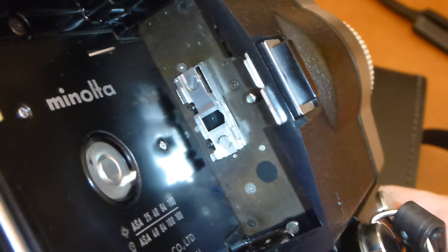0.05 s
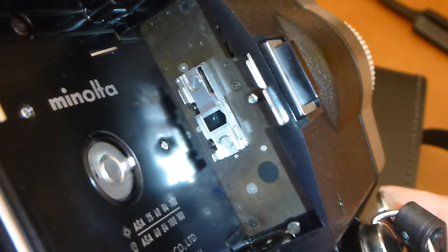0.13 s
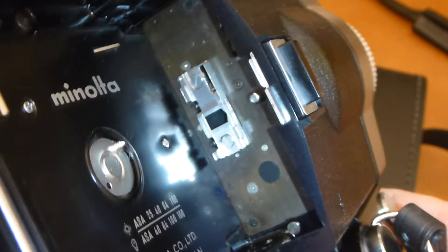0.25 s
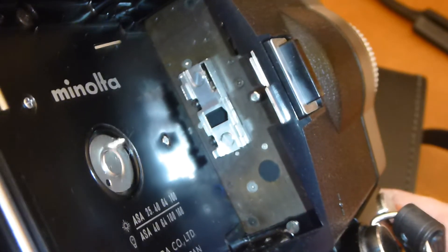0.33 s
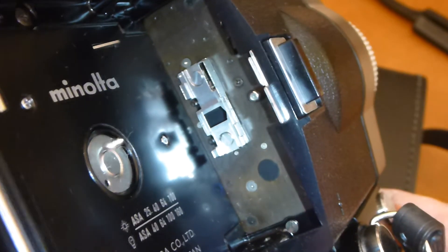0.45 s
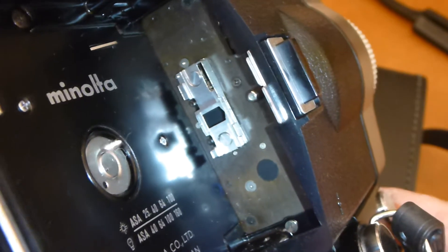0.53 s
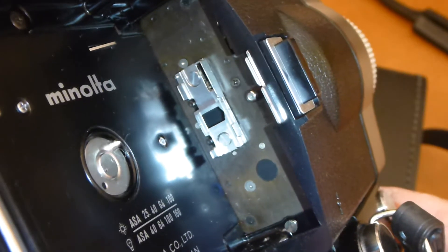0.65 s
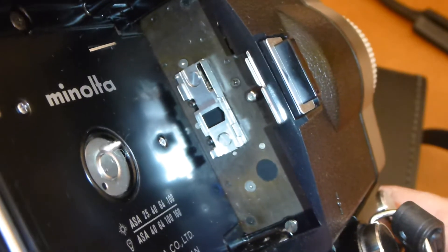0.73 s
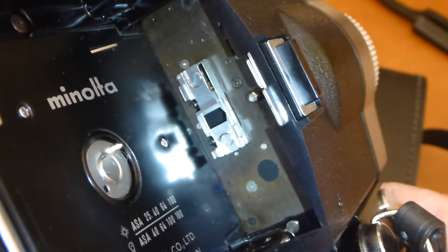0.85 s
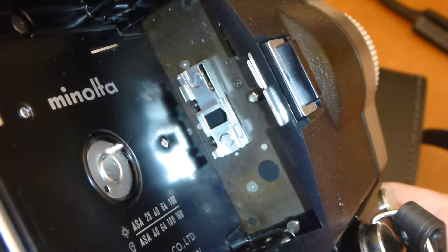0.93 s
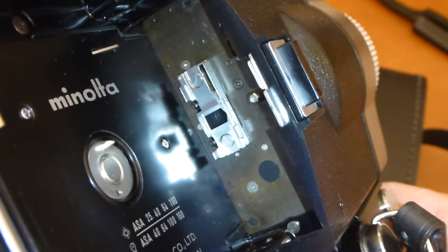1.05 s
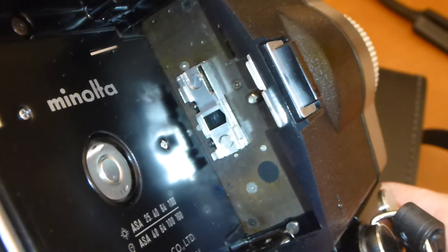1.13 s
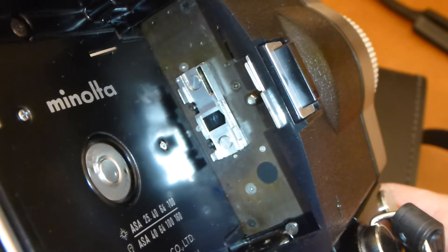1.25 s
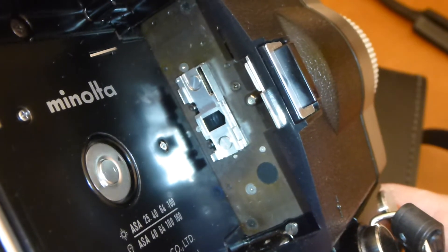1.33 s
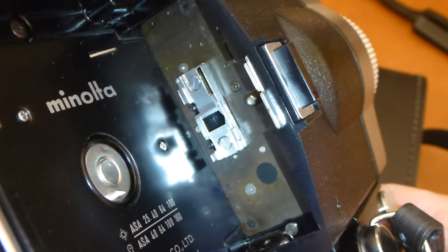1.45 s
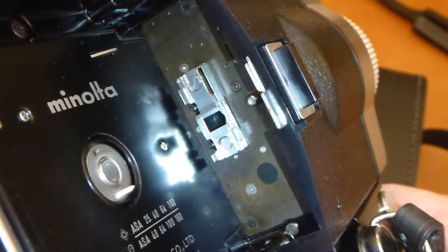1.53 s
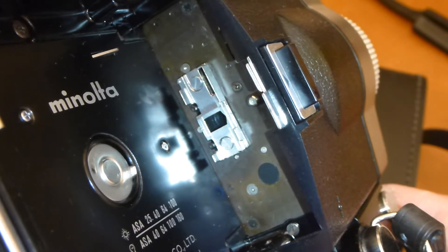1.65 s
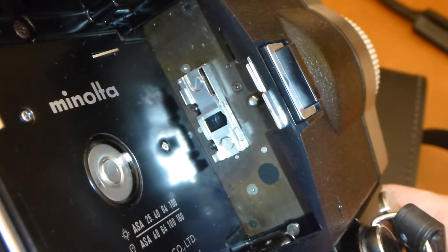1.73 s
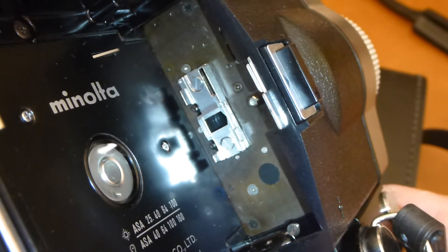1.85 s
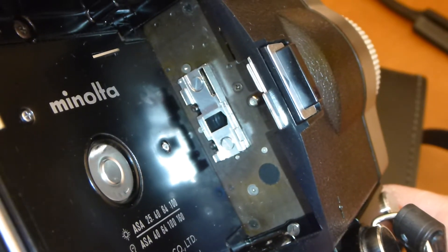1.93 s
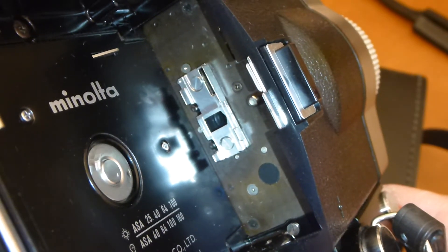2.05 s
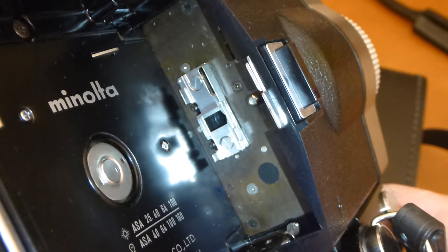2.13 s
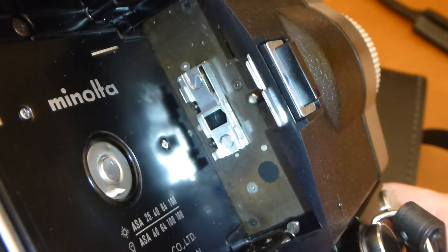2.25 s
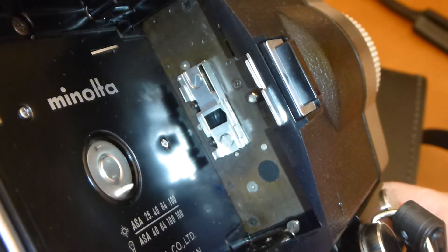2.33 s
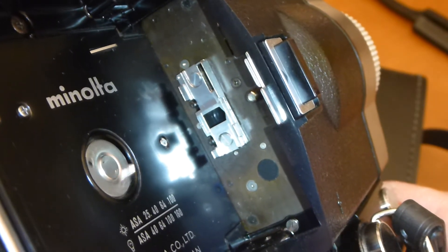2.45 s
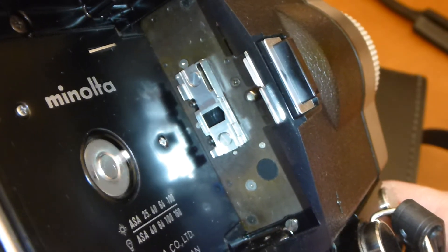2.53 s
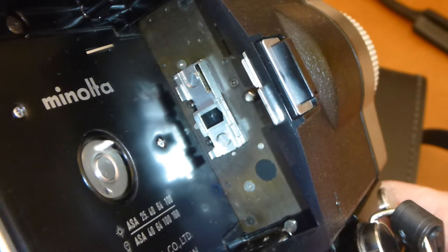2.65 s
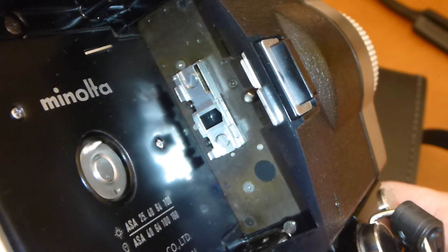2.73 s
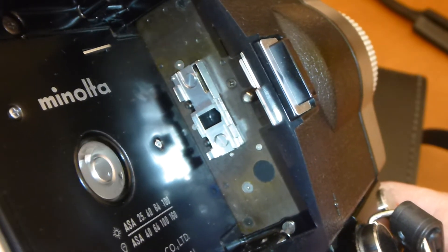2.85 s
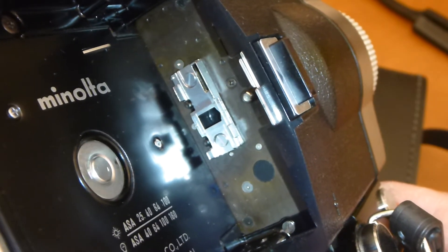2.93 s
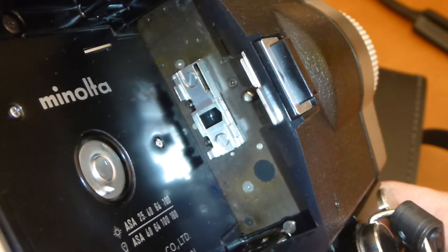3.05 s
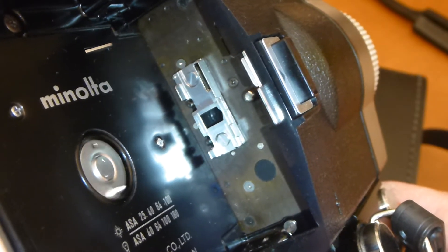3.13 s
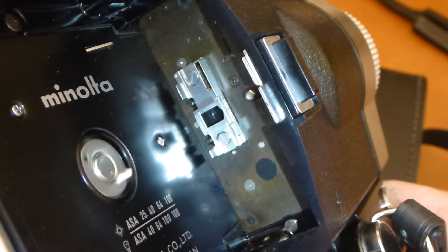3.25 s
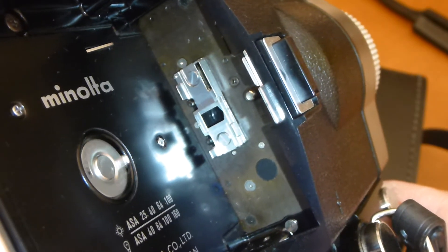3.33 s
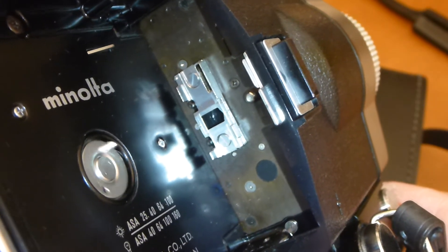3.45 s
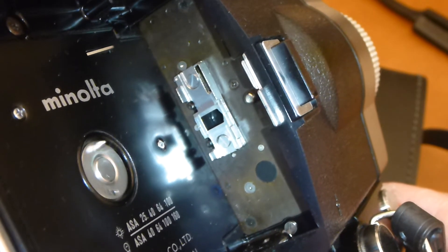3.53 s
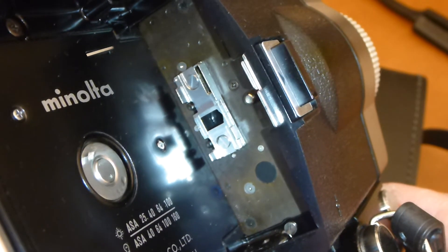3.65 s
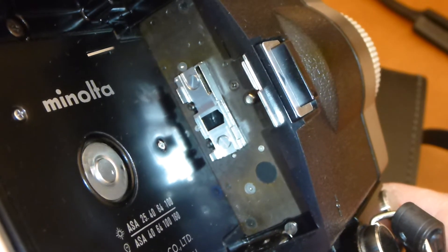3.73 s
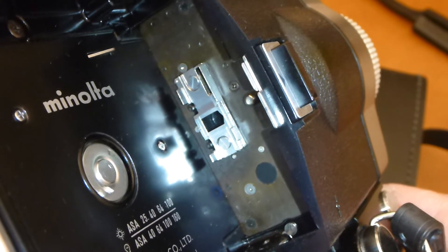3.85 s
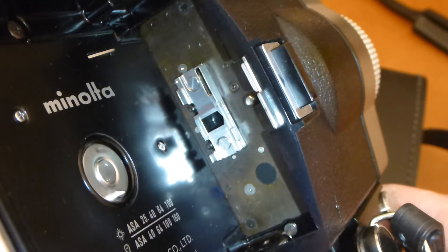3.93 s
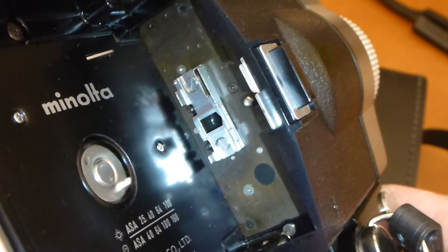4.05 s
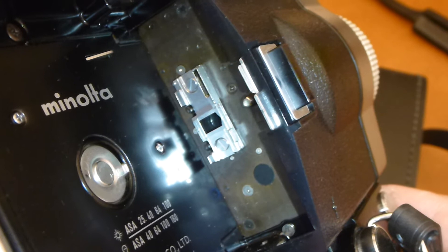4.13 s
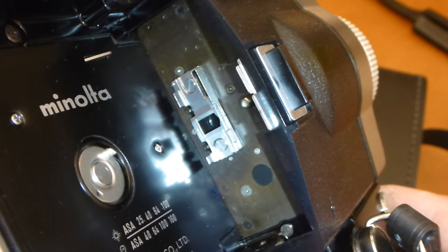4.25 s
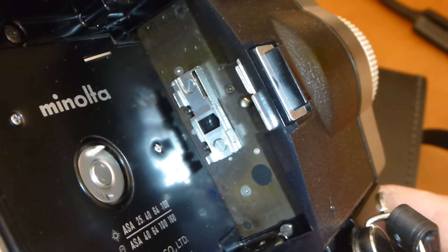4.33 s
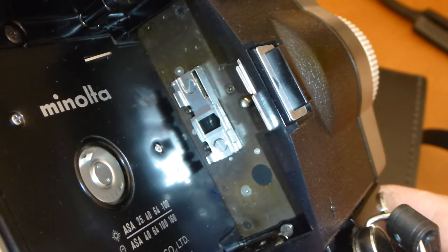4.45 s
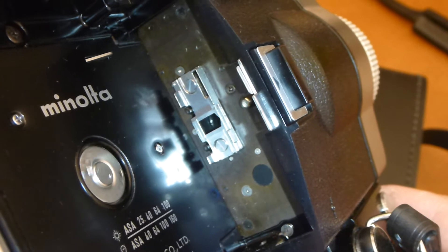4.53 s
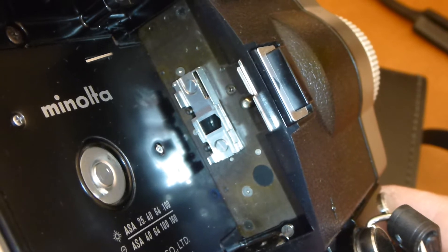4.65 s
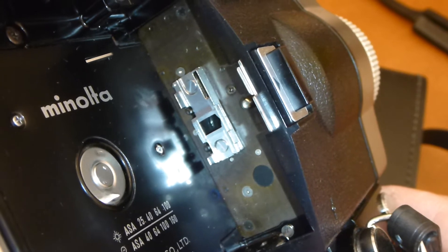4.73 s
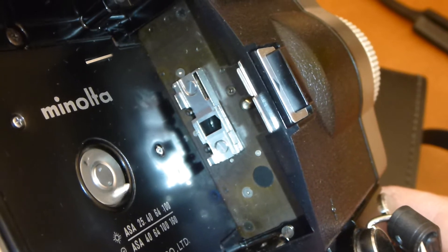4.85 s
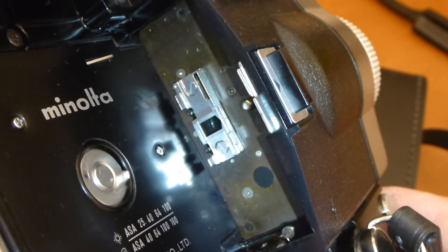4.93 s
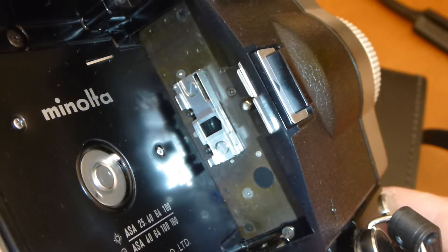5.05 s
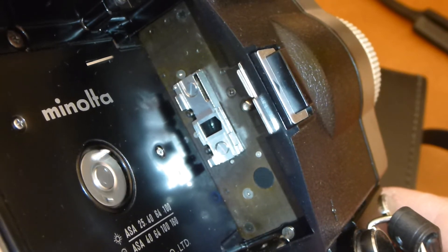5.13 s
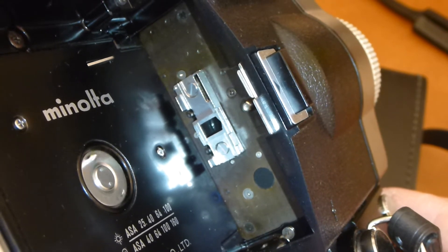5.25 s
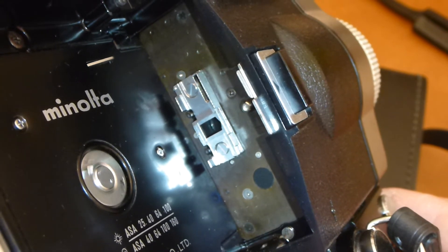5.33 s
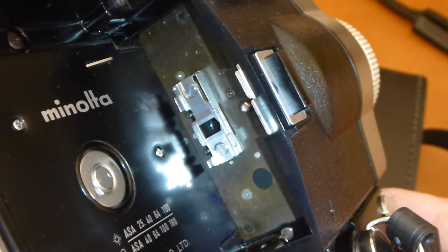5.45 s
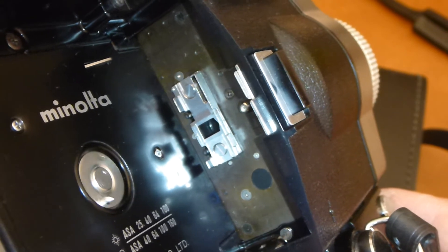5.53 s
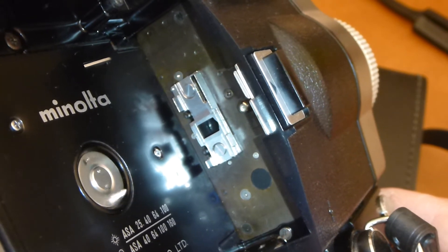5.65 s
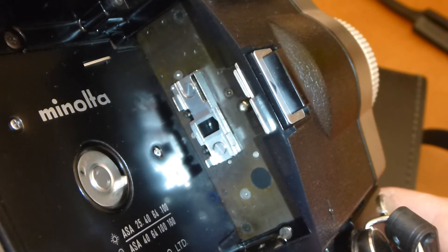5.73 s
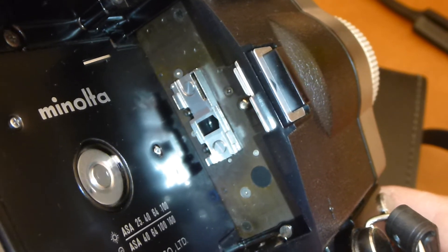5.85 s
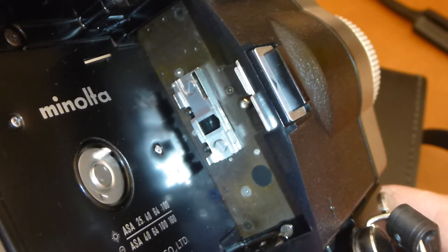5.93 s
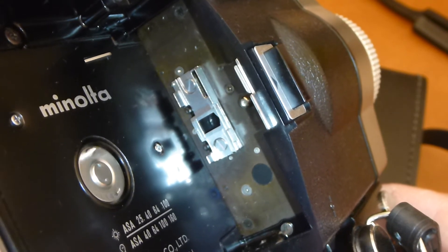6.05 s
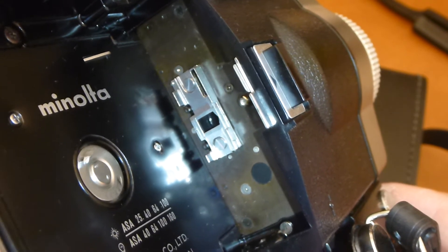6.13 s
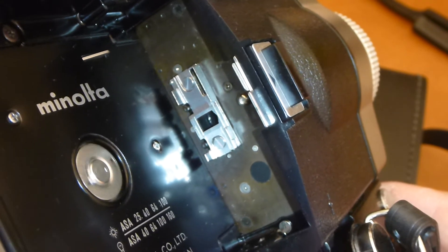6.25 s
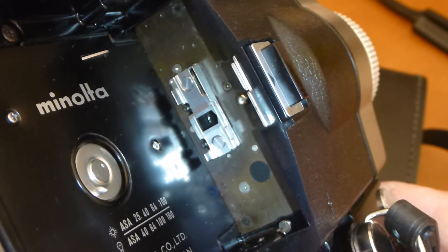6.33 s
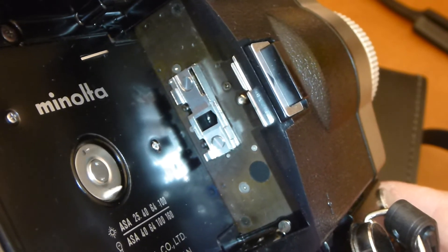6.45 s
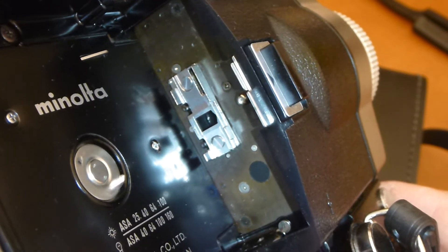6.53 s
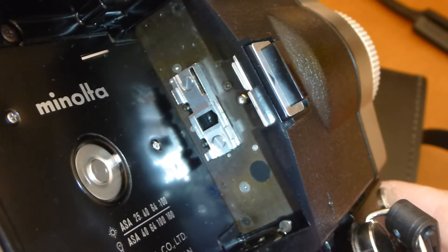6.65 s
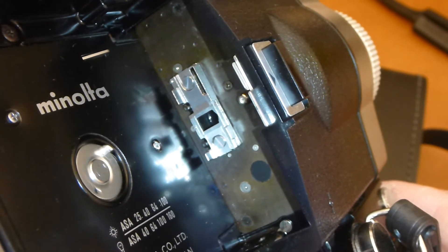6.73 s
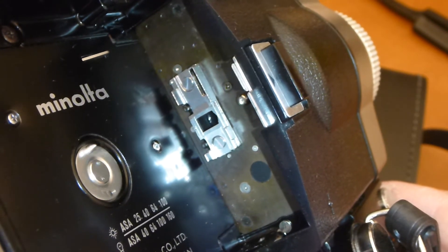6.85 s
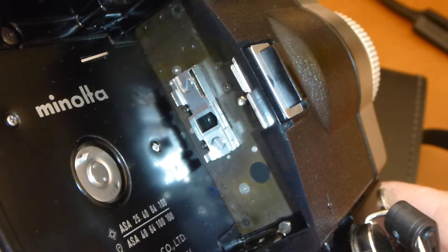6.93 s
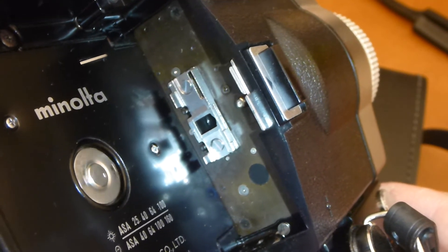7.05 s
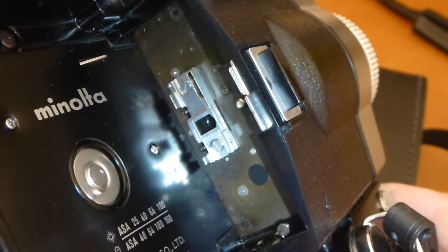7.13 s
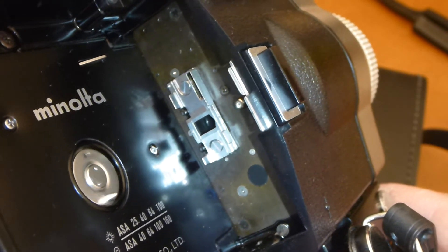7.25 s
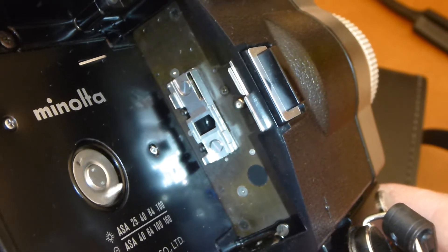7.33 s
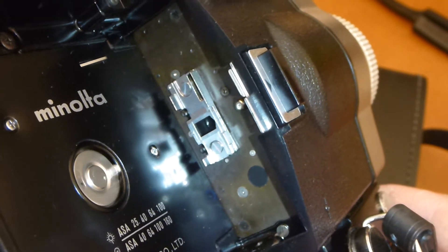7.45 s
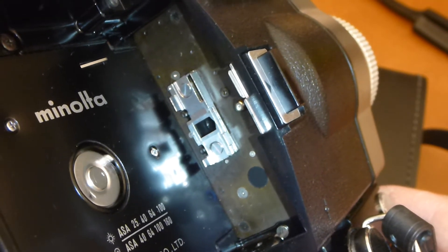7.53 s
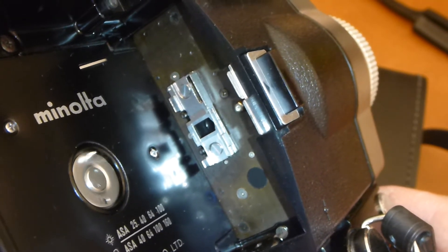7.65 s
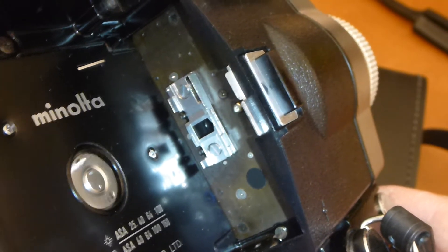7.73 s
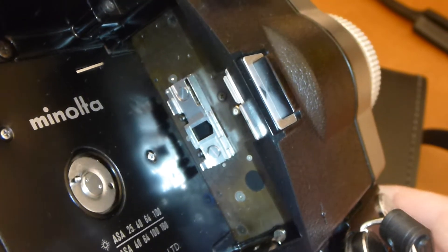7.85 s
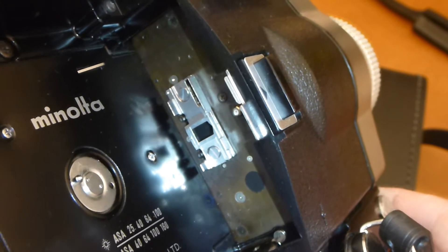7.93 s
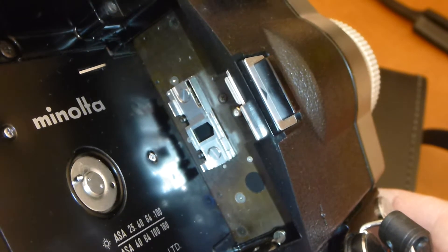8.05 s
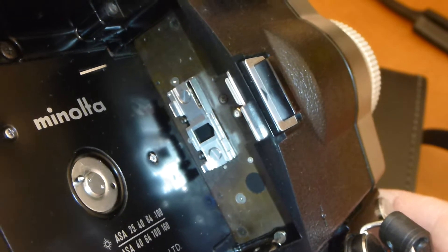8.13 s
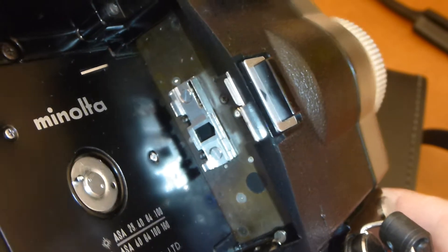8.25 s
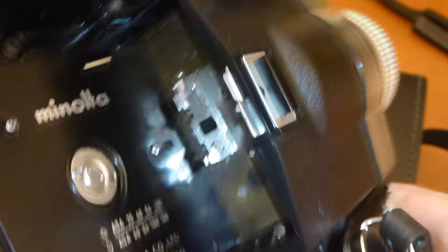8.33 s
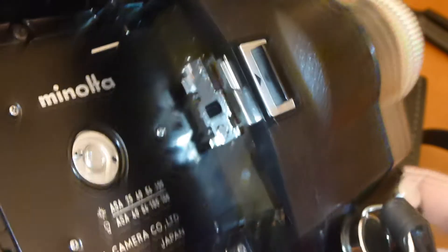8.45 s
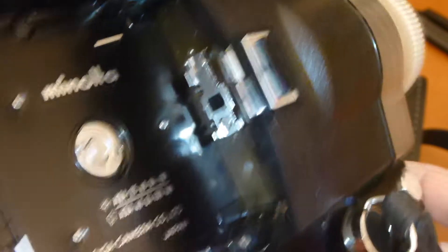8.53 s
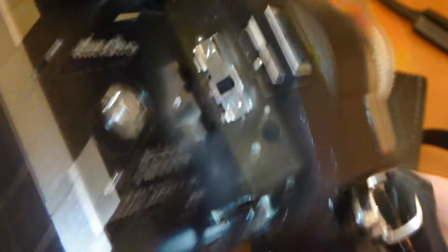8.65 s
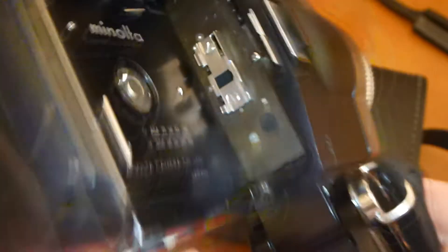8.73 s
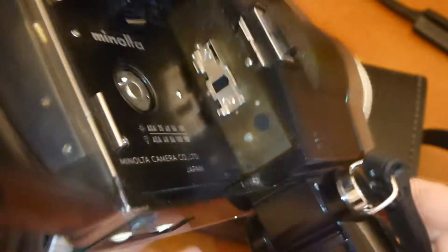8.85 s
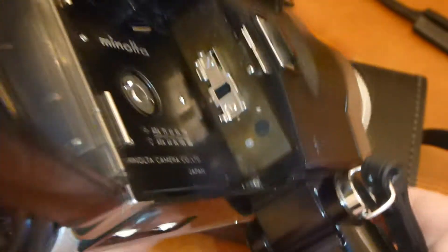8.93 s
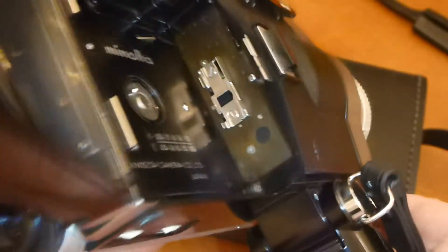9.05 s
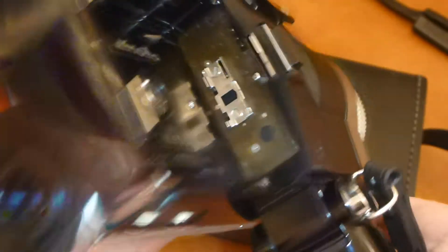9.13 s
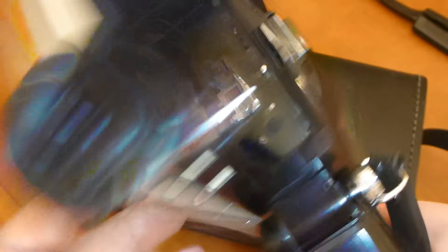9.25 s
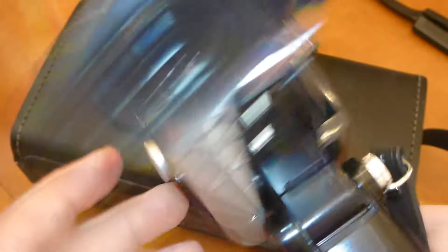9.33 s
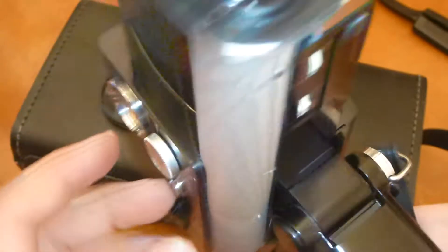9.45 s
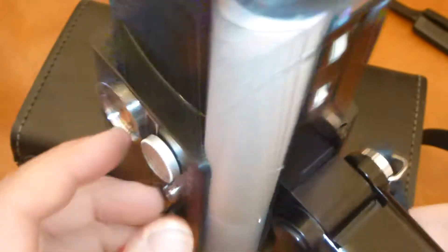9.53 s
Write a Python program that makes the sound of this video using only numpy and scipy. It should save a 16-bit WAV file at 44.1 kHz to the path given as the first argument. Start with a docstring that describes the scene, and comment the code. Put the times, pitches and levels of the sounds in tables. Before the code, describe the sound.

Close, dry mechanical purr of fast metallic snaps and rattling gears, cut off by latch clacks, with faint handling ticks at the end.

```python
"""In a small room, a hand-held cine camera runs with its film door open, close to the microphone.
About 18 times a second its claw snaps: bursts of tiny contacts ring the resonances of the body.
Gritty noise through the same body is the gear train, rattling and breaking into bouts of chatter; a
pinion whines thinly over it. The release latch clacks as the motor stops, restarts and stops again.
Fingers tap the case, and afterwards the camera ticks softly in the hand over rumble, hiss and a whine."""
import sys
import numpy as np
from scipy import signal
from scipy.fft import rfft, irfft, next_fast_len
from scipy.io import wavfile
from scipy.ndimage import map_coordinates

SR = 44100
rng = np.random.default_rng(int(sys.argv[2]) if len(sys.argv) > 2 else 0)


def wav_out(sig):
    """Save sig, one row per channel (or a flat mono array), as 16-bit PCM at SR to the path in sys.argv[1]."""
    wavfile.write(sys.argv[1], SR, np.round(np.clip(np.atleast_2d(sig).T, -1, 1) * 32767).astype(np.int16))


N = 422916
TIME = np.arange(N) / SR
SIZE = next_fast_len(N + SR // 2, real=True)  # room for tails to ring out
HZ = np.fft.rfftfreq(SIZE, 1 / SR) + 1e-3  # kept above zero for division


def amp(db):
    """Decibels to gain."""
    return 10 ** (np.asarray(db) / 20)


def unit(x):
    """Scale to rms 1."""
    return x / np.sqrt(np.mean(np.abs(x) ** 2) + 1e-20)


def along(points, hz=HZ):
    """Read a curve of (hz, value) points on a log frequency axis."""
    point_hz, value = np.transpose(points)
    return np.interp(np.log(hz + 1), np.log(point_hz + 1), value)


def wobble(rate):
    """A smooth random curve with this many knots a second."""
    knots = rng.standard_normal(int(N * rate / SR) + 4)
    return map_coordinates(knots, [TIME * rate])


def filtered(x, response):
    """Shape a sound with a response given on the frequency grid."""
    return irfft(rfft(x, SIZE) * response, SIZE)[..., :N]


def causal(gain):
    """Minimum-phase response: rings only after a blow, and keeps the power of white noise."""
    cepstrum = irfft(np.log(np.maximum(unit(gain), 1e-6)), SIZE)
    cepstrum[1:SIZE // 2] *= 2
    cepstrum[SIZE // 2 + 1:] = 0
    return np.exp(rfft(cepstrum))


def resonance(hz, width):
    """Gain of one resonant peak with steep skirts."""
    detuning = (HZ / hz - hz / HZ) * hz / width
    return (1 + detuning ** 2) ** -.75


def grit(count, spread_db):
    """A run of tiny contacts of very unequal force, rms 1."""
    sign, force = rng.standard_normal((2, count))
    return unit(sign * amp(spread_db * force))


def burst(t60, spread_db):
    """50 ms of contacts that die away, with the energy of 8 ms at rms 1."""
    t = np.arange(SR // 20) / SR
    dying = unit(grit(len(t), spread_db) * amp(-60 * t / t60))
    return dying * np.sqrt(.008 * SR / len(t))


def add(track, s, sound):
    """Mix a sound into a track at time s."""
    part = track[max(round(s * SR), 0):][:len(sound)]
    part += sound[:len(part)]


# the motor's pace, one list per run: time_s, advance_frames (film frames pulled so far)
ADVANCE = [
    [(.005, 0), (.224, 4)],
    [(1.0195, 0), (1.2366, 4), (1.6216, 11), (1.9974, 18), (2.3242, 24), (2.9308, 35), (3.8633, 52),
     (4.134, 57), (4.517, 64), (4.679, 67), (5.5043, 82), (6.609, 102), (7.16, 112), (7.4861, 118),
     (7.761, 123)],
]


def snap_times():
    """The claw snaps each time the motor has advanced the film by one whole frame."""
    runs = [np.transpose(run) for run in ADVANCE]
    return np.concatenate([np.interp(np.arange(frames[-1] + 1), frames, s) for s, frames in runs])


# resonances of the camera body: pitch_hz, width_hz, struck_db (by claw or latch), shaken_db (by gears);
# both levels are relative between the modes
BODY = [(643, 170, -13, -20), (915, 280, -9, -6.5), (1114, 59, -1, -6), (1228, 120, -11.5, -7.5),
        (1401, 29, -5.5, -7.5), (1602, 149, -0.5, -1.5), (1766, 140, -1, -10), (2034, 103, 1.5, 1),
        (2116, 260, -8, 0), (2400, 290, 0, -11.5), (2637, 230, -1.0, -5), (3020, 550, -0.5, -15),
        (3616, 230, -6, -8.5), (3896, 470, -7.5, -15.5), (4631, 198, -2, -4.5), (5130, 520, -9.5, -14.5),
        (5936.0, 290, -19, -11), (6940, 1090, -6.5, -16), (9300, 1600, -3.5, -13), (10930, 2000, -5.5, -14),
        (12750, 720, -6, -12), (14000, 1600, -11, -36)]


def struck_body(cracks, clatter):
    """The bright crack of each blow reaches the high modes; its duller clatter rings the low ones."""
    modes = np.sqrt(sum((amp(db) * resonance(hz, width)) ** 2 for hz, width, db, _ in BODY))
    hard = amp(along([(1500, -4.5), (4500, -6), (8500, -1.5), (15000, 8.0)]))
    soft = amp(along([(3500, 2.5), (7000, -2.5), (15000, -2.5)]))
    bright_ring = filtered(cracks, causal(modes * hard))
    dull_ring = filtered(clatter, causal(modes * soft))
    return bright_ring + dull_ring


CRACK_DB, CLATTER_DB = -26, -24.5  # base levels of the claw's bright crack and duller clatter
CRACK_VARIES_DB, CLATTER_VARIES_DB = 1.6, 1.2  # chance change from stroke to stroke
# contacts of one claw stroke (entering, sliding, the snap, two rebounds, settling, dropping back):
# delay_s, scatter_s (either way), crack_db, clatter_db (both relative to the base levels)
STROKE = [(-.0128, 0.0043, -18, -9), (-.004, .002, -16, -14.5), (-.0004, 0, -4.5, -2.5),
          (.0008, 0.0026, -13, -7), (.003, .0006, -15.5, -8), (.0083, 0.0068, -9, -7),
          (0.025, 0.0032, -33, -9.5)]


def claw():
    """Each frame the claw enters, snaps against its stop, rebounds and drops back, ringing the body."""
    cracks, clatter = np.zeros((2, N))
    for s in snap_times():
        crack_db = CRACK_DB + CRACK_VARIES_DB * rng.standard_normal()
        clatter_db = CLATTER_DB + CLATTER_VARIES_DB * rng.standard_normal()
        for delay, scatter, hard_db, soft_db in STROKE:
            late, force = rng.uniform(-1, 1, 2)
            when = s + delay + scatter * late
            # light contacts vary more from frame to frame than the snap does
            varied_db = .13 * hard_db * force
            crack_gain = amp(crack_db + hard_db + varied_db)
            clatter_gain = amp(clatter_db + soft_db + varied_db)
            add(cracks, when, crack_gain * burst(t60=0.005, spread_db=1))
            add(clatter, when, clatter_gain * burst(t60=0.041, spread_db=0))
    return struck_body(cracks, clatter)


# blows of the release latch and stop pawl: start_s, clatter_db, crack_db (relative to the clatter)
LATCH = [(0.187, -32, -13), (0.194, -26, -5), (0.244, -30, 3), (0.247, -23.5, 4.5), (0.9677, -22, -18),
         (0.9705, -22, -7), (7.8062, -28, -13), (7.8122, -21, -2), (7.817, -23, -6), (7.823, -26, -8),
         (7.8368, -30, -1), (7.8402, -22, 2.5)]


def latch():
    """The release latch and stop pawl strike the same body, each blow a crack with a clatter."""
    cracks, clatter = np.zeros((2, N))
    for s, db, crack_db in LATCH:
        add(cracks, s, amp(db + crack_db) * burst(t60=0.011, spread_db=1))
        add(clatter, s, amp(db) * burst(t60=.028, spread_db=1))
    return struck_body(cracks, clatter)


# while the motor turns: start_s, stop_s
RUNS = [(0, 0.27), (0.97, 7.83)]


def running():
    """1 while the motor turns, 0 at rest, with short ramps between."""
    ramp_s = .004
    return sum(np.clip(np.minimum(TIME - start, stop - TIME) / ramp_s, 0, 1) for start, stop in RUNS)


RATTLE_GAIN_DB, RATTLE_VARIES_DB = -3, 1.35  # overall gain; chance change from frame to frame
CHATTER_EDGE_S = 0.033  # a bout takes this long to build up and to settle
CHATTER_BRIGHTENS = .6  # extra dB of treble for each dB of chatter or chance change
# the steady gear rattle: time_s, level_db (before the overall gain)
RATTLE = [(0, -31), (2, -31.5), (3.2, -30), (4.3, -30), (4.8, -32), (5.3, -32), (6.5, -30), (7.8, -32)]
# bouts in which the loose gears break into loud chatter: start_s, length_s, boost_db (over the rattle)
CHATTER = [(0.0, 0.08, 5.5), (0.227, 0.036, 2), (1.335, 0.061, 8), (1.828, 0.04, 4), (2.397, 0.031, 6),
           (2.565, 0.09, 4.1), (2.972, 0.12, 5.5), (3.48, 0.052, 4.5), (3.696, 0.086, 5),
           (4.012, 0.23, 4.5), (4.507, 0.092, 7), (5.037, 0.11, 4), (5.175, 0.052, 4.4), (5.272, 0.13, 7),
           (5.495, 0.051, 8), (5.89, 0.067, 4.5), (6.105, 0.051, 7), (6.231, 0.14, 4), (6.852, 0.17, 6),
           (7.037, 0.22, 6.5), (7.309, 0.062, 5.9), (7.507, 0.15, 5.0), (7.695, 0.18, 8)]


def gears():
    """Loose teeth rattle anew after each claw pull; in bouts of chatter the body rings louder, brighter."""
    snaps = snap_times()
    between = (snaps[:-1] + snaps[1:]) / 2
    chance_db = RATTLE_VARIES_DB * np.interp(TIME, between, rng.standard_normal(len(between)))

    bout_db = np.zeros(N)
    for start, length, db in CHATTER:
        inside_s = np.minimum(TIME - start, start + length - TIME)
        bout_db = np.maximum(bout_db, db * np.clip(.5 + inside_s / CHATTER_EDGE_S, 0, 1))

    level_db = np.interp(TIME, *np.transpose(RATTLE)) + bout_db + chance_db + RATTLE_GAIN_DB
    flutter_db = 1.5 * wobble(110)
    tooth_db = 2.4 * wobble(700)
    contacts = unit(grit(N, spread_db=3) * amp(flutter_db + tooth_db))
    teeth = running() * contacts * amp(level_db)

    modes = causal(np.sqrt(sum((amp(db) * resonance(hz, width)) ** 2 for hz, width, _, db in BODY)))
    treble = 1 / (1 + (4000 / HZ) ** 2)
    brightness = amp(CHATTER_BRIGHTENS * (bout_db + chance_db) + wobble(25))
    low_rattle = filtered(teeth, modes * (1 - treble))
    high_rattle = amp(-3.5) * filtered(teeth * brightness, modes * treble)
    # the case as a whole answers with a weak low drone
    drone = amp(-22.0) * filtered(teeth, causal(resonance(hz=316, width=370)))
    # the running motor also shakes the hand and the microphone
    shake = amp(-35) * filtered(teeth, causal(resonance(hz=55, width=85)))
    return low_rattle + high_rattle + drone + shake


def pinion():
    """The motor's fast first gear sings one thin line, wavering in pitch and level."""
    pitch_hz = 1116 + 13.5 * (wobble(4) + wobble(60))
    level_db = -55 + 3.3 * wobble(12)
    return running() * np.sin(2 * np.pi * np.cumsum(pitch_hz) / SR) * amp(level_db)


# small ticks as the camera is turned in the hand: start_s, strength_db (sets both parts of the tick)
TICKS = [(9.252, -36), (9.263, -39), (9.33, -39), (9.35, -33), (9.37, -32.5), (9.391, -31.5), (9.419, -33),
         (9.438, -32.5), (9.451, -30.5), (9.463, -30), (9.481, -30), (9.568, -27)]
# resonances of the small fitting that ticks: pitch_hz, width_hz, level_db (relative between the modes)
FITTING = [(1050, 500, 6.5), (2330, 730, -3.5), (3730, 990, -9.5), (5330, 320, -11), (6550, 410, -15),
           (8260, 600, -26), (11000, 1400, -16), (12700, 900, -19), (15200, 900, -28)]


def fitting_ticks():
    """A small fitting ticks: the lighter the tick, the larger its share of treble."""
    knocks, snicks = np.zeros((2, N))
    for s, db in TICKS:
        # the treble follows only half the tick's strength
        add(snicks, s, amp(db / 2 - 34.5) * burst(t60=0.014, spread_db=4))
        add(knocks, s, amp(db - 9.5) * burst(t60=.022, spread_db=1.5))
    modes = np.sqrt(sum((amp(db) * resonance(hz, width)) ** 2 for hz, width, db in FITTING))
    treble_ring = filtered(snicks, causal(modes * HZ ** 2))
    return treble_ring + filtered(knocks, causal(modes))


# fingers tap the case and press the release: start_s, level_db, centre_hz, t60_s (before the filter)
TAPS = [(.312, -51, 800, .02), (.382, -58, 1210, .02), (0.498, -44.5, 704, .022), (.503, -50, 2200, .02),
        (.789, -53, 9300, .015), (.844, -52, 2500, .015), (0.9709, -20.5, 1710, 0.042),
        (2.877, -39, 297.4, 0.03), (8.4622, -40.5, 1980, 0.012)]


def finger_taps():
    """Each tap is a dying burst of contacts held to one octave around its centre."""
    taps = np.zeros(N)
    for s, db, hz, t60 in TAPS:
        octave = signal.butter(2, [hz / np.sqrt(2), hz * np.sqrt(2)], "bandpass", fs=SR, output="sos")
        blow = burst(t60=t60, spread_db=3.5)
        add(taps, s, amp(db) * np.std(blow) * unit(signal.sosfilt(octave, blow)))
    return taps


ROOM_DB = -17.5  # the room's answer
# how long the room rings: pitch_hz, t60_s
ROOM_DECAY = [(300, 0.81), (2000, 0.34), (8000, 0.16), (15000, 0.19)]


def room(x):
    """The small room answers 5 ms late with a noise tail whose treble dies sooner than its bass."""
    hz, t, z = signal.stft(rng.standard_normal(SR // 2), SR, nperseg=256)
    decay = amp(-60 * t / along(ROOM_DECAY, hz)[:, None])
    tail = signal.istft(z * decay, SR, nperseg=256)[1]
    delay = np.exp(-2j * np.pi * HZ * .005)
    return filtered(x, rfft(tail / np.linalg.norm(tail), SIZE) * delay)


# loudness of the room rumble and hiss: time_s, level_db
ROOM_LEVEL = [(0, -48), (.5, -50), (1, -48.5), (7.8, -48), (8.05, -50.5), (8.6, -48), (9.2, -46.5),
              (9.59, -45.5)]
# its spectrum: pitch_hz, density_db (per Hz, relative)
ROOM_COLOUR = [(20, -29), (58, -15), (123, -5.5), (260, -4), (600, -8.5), (1100, -14), (2500, -19.5),
               (4500, -26), (9000, -29.5), (13000, -33.5), (16000, -40)]


def room_rumble():
    """Coloured noise makes a low rumble with hiss, drifting slightly in level."""
    rumble = unit(filtered(rng.standard_normal(N), amp(along(ROOM_COLOUR))))
    level_db = np.interp(TIME, *np.transpose(ROOM_LEVEL)) + 0.3 * wobble(5.6)
    return rumble * amp(level_db)


def electrical_whine():
    """A thin sine, slightly unsteady in pitch and level."""
    pitch_hz = 7800 + 14 * wobble(81)
    level_db = -64.5 + 1.5 * wobble(27)
    return np.sin(2 * np.pi * np.cumsum(pitch_hz) / SR) * amp(level_db)


def scene():
    """The camera, the room's answer and the background, the same in both channels."""
    mechanism = claw() + latch() + gears() + pinion()
    camera = mechanism + fitting_ticks() + finger_taps()
    background = room_rumble() + electrical_whine()
    sound = camera + amp(ROOM_DB) * room(camera) + background
    return np.array([sound, sound])


TOP_HZ = 15700  # band limit
# dips cut by the microphone port: centre_hz, width_hz (at half the dB depth), depth_db
PORT_NOTCHES = [(2898, 138, -9), (7500, 74, -9), (11670, 610, -17)]


def record(dry):
    """The microphone port cuts narrow dips; the treble ends steeply at the band limit."""
    dips_db = sum(db / (1 + (2 * (HZ - hz) / width) ** 2) for hz, width, db in PORT_NOTCHES)
    band_limit = 1 / np.sqrt(1 + (HZ / TOP_HZ) ** 400)
    return filtered(dry, causal(amp(dips_db)) * band_limit)


dry = scene()
out = record(dry)
wav_out(out)
```